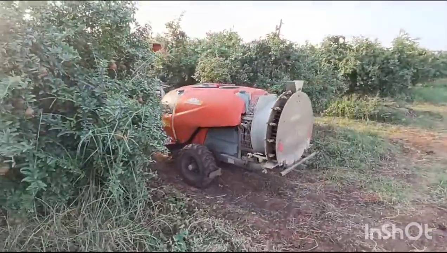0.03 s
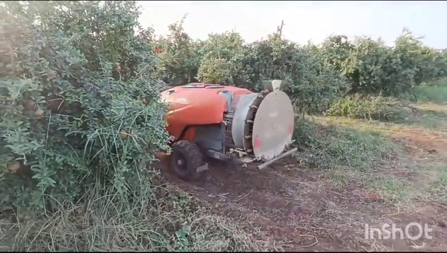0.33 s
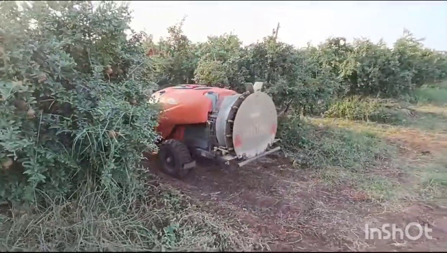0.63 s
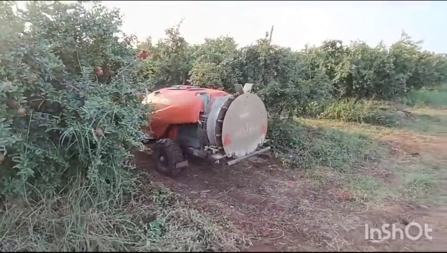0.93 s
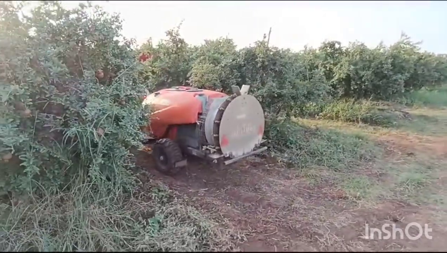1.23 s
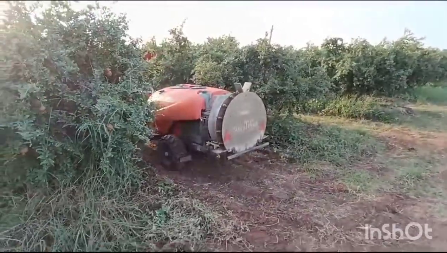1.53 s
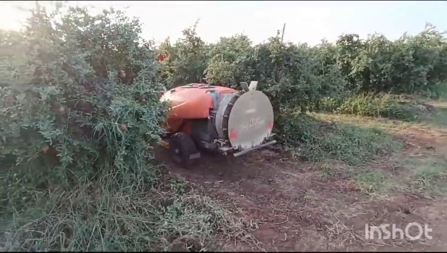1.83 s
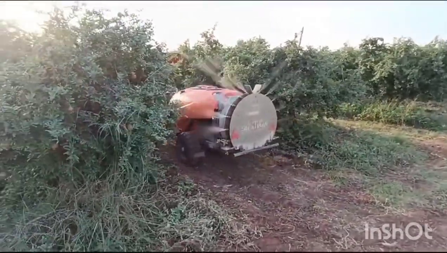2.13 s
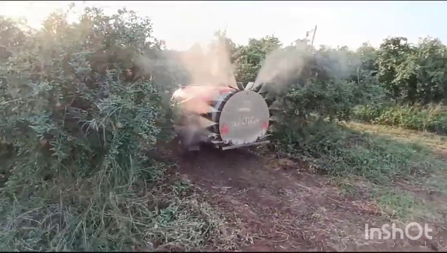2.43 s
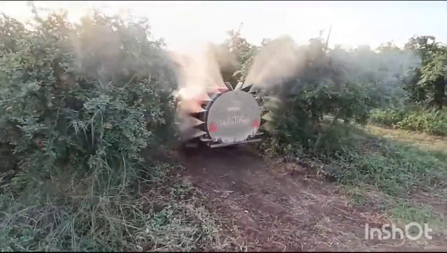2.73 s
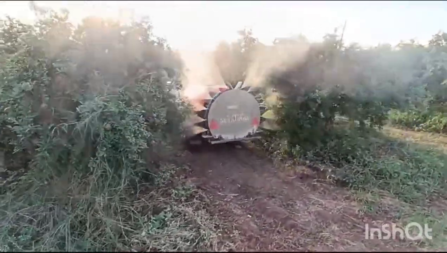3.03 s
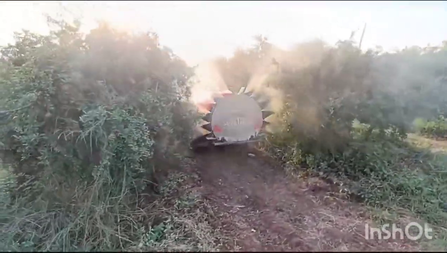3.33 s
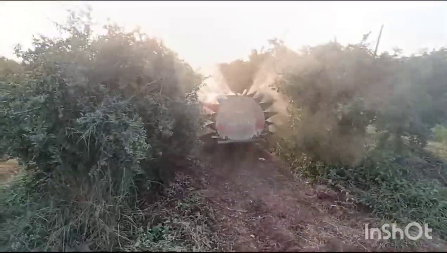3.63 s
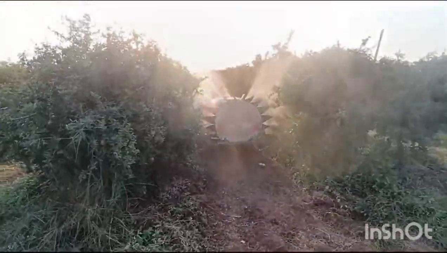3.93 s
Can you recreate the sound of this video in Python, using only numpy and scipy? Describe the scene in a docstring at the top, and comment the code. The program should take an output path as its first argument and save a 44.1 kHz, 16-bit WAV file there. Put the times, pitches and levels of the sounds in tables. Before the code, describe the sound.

A sprayer fan builds to a rushing roar among orchard rows. First a diesel tractor chugs at idle in light wind, then the drive clunks in and squeals faintly, and the blower and hissing nozzles take over.

```python
"""Tractor starting an orchard sprayer

A diesel tractor idles between orchard rows, each firing puffing the exhaust and jolting the engine.
The drive of its air-blast sprayer engages with a clunk, drags the engine down and chirps on each firing
while it slips. The fan winds up to a roar and the nozzles hiss as liquid breaks into mist.
Close by there is light wind, a twig snap, a few dry ticks and a short swish."""
import sys
import numpy as np
from scipy import signal
from scipy.fft import rfft, irfft
from scipy.io import wavfile
from scipy.ndimage import uniform_filter1d, map_coordinates

SR = 44100
rng = np.random.default_rng(int(sys.argv[2]) if len(sys.argv) > 2 else 0)


def digitize_waveform(pressure):
    """Quantize a signal to 16-bit integers and store it at the path in sys.argv[1].

    Rows of a 2-D input are taken as channels; values are limited to [-1, 1].
    """
    field = np.atleast_2d(pressure).T
    bounded = np.clip(field, -1, 1)
    quanta = np.round(bounded * 32767).astype(np.int16)
    wavfile.write(sys.argv[1], SR, quanta)


N = 176400
T = np.arange(N) / SR

# how often the engine fires (t/s, f/Hz)
FIRING_RATE = [(0, 38.6), (.75, 38.2), (1.28, 38.6), (1.37, 37.8), (1.5, 35.0), (1.64, 33.8), (2.2, 33.8),
               (2.5, 34.9), (2.9, 36.0), (3.25, 35.7), (3.65, 35.2), (4, 35.5)]
# exhaust tones: running free, under load, and with the fan up to speed (firing rate multiple, level/dB)
FREE_NOTE = [(1, -0.5), (2, -11.5), (3, -15.5), (4, 2), (5, -3.5), (6, -14.5), (7, -23), (8, -7),
             (9, -14.5), (10, -19.5), (11, -17), (12, -19.5), (13, -20.5), (14, -33)]
LOAD_NOTE = [(1, -11), (2, 2), (3, 1.5), (4, 2), (5, -5), (6, -21), (7, -11.5), (8, -21.5), (9, -13.5),
             (10, -7), (11, -19), (12, -15), (13, -12), (14, -6)]
DRONE_NOTE = [(1, -38.5), (2, -34.5), (4, -26)]
# engine clatter; a spectrum says how strong a noise is from low to high (f/Hz, level/dB)
CLATTER_SPECTRUM = [(25, -26), (60, 1), (170, 2.5), (300, -3.5), (480, -0.5), (720, -13), (880, -10),
                    (1100, -19.5), (1400, -12), (1700, -21.5), (2100, -17.5), (3300, -21), (4300, -22.5),
                    (6400, -29.5), (8200, -32.5), (11000, -37.5), (15500, -49)]
# ringing tones of the engine block; t60 is the time to fade by 60 dB (f/Hz, level/dB, t60/s)
BLOCK_RINGS = [(900, 2.5, 0.044), (1392, -1.5, 0.11), (2030, -1, 0.056), (2416, -6, 0.056),
               (2770, -4, 0.083), (3410, -13, 0.044), (3860, -2.5, .04), (4260, -4, .05), (6420, -11, .04)]
# light wind (f/Hz, level/dB)
BREEZE_SPECTRUM = [(15, -7), (35, -10), (70, -3.5), (120, -7), (300, -3), (1000, -67)]
# a twig snap and small dry ticks (t/s, level/dB, t60/s)
SNAP = (.0838, -20.5, 0.045)
TICKS = [(.209, -35.5, .03), (.231, -49, .04), (1.705, -38, .025)]
# the snap, the ticks, swishing stalks and a faint rustle (f/Hz, level/dB)
SNAP_SPECTRUM = [(300, -14), (900, -14), (1300, -7.5), (1700, 4), (2200, -15), (4200, -12.5), (6000, -26),
                 (8200, -26), (15500, -35)]
TICK_SPECTRUM = [(1500, -16), (5000, 3), (8000, -3), (11000, -4), (15500, -9)]
SWISH_SPECTRUM = [(800, -25), (2000, -1), (3100, 2), (5000, -2), (8000, -14), (11000, -23), (15500, -35)]
RUSTLE_SPECTRUM = [(2000, -8), (5000, -2), (10000, -9), (13000, -4), (15500, 2)]
# thin squeaks (t/s, f/Hz, level/dB)
SQUEAKS = [(.398, 7450, -42), (1.487, 7550, -47), (1.516, 7000, -43.5)]
# steel parts meeting as the drive engages (t/s, level/dB)
CLUNK_HITS = [(1.426, -1), (1.433, -8.5), (1.444, -2.5)]
# their ringing tones (f/Hz, level/dB, t60/s)
CLUNK_RINGS = [(346, -0.5, 0.15), (761, -10, 0.23), (1037, -1, 0.19), (1124, -4, .12), (2050, -12, 0.23),
               (2430, -24, 0.35), (2820, -9, 0.38), (3270, -4, 0.15), (3636, -4, 0.15), (3710, -20, 0.2),
               (5000, -6, 0.081), (5740, -13.5, 0.29)]
# the crash of the first hit (f/Hz, level/dB)
CRASH_SPECTRUM = [(150, -6), (350, 4.5), (1100, -0.5), (1600, -10.5), (3400, -8.5), (5500, -15),
                  (8300, -20.5), (12000, -29), (15500, -40)]
# loudness of the slipping drive (t/s, level/dB)
SLIP_LEVEL = [(0, -100), (1.46, -62), (1.59, -39.5), (1.78, -40), (1.95, -37), (2.25, -46), (2.6, -53),
              (4, -91)]
# the tones it squeals on (f/Hz, width/Hz, level/dB)
SLIP_TONES = [(2130, 56.3, -2.5), (2440, 50, -1.5), (4370, 150, 0), (7100, 200, -15)]
# loudness of the fan's three noises (t/s, rumble level/dB, rush level/dB, high air level/dB)
FAN_LEVELS = [(0, -83, -80, -80), (1.4, -62, -70, -63), (1.7, -42, -41, -47.5), (1.85, -41, -31.5, -44.5),
              (1.97, -27, -25.5, -35), (2.2, -33, -23, -30.5), (2.4, -21.5, -20.5, -31),
              (2.58, -23, -21, -31.5), (2.9, -22, -21, -31), (3.2, -24, -22, -31.5),
              (3.55, -21, -23.5, -35), (3.75, -23.5, -22, -34.5), (4, -20.5, -22.5, -34)]
# the same three noises from low to high (f/Hz, level/dB)
RUMBLE_SPECTRUM = [(20, -39), (45, -18), (100, -17.5), (125, -7), (150, 2), (178, -5), (212, -14.5),
                   (300, -20), (600, -44)]
RUSH_SPECTRUM = [(100, -23), (200, -5), (270, -4), (320, -7), (400, -1), (460, 4), (520, 0.5), (620, -6.5),
                 (740, -6.5), (900, -5.5), (1040, -10.5), (1200, -8.5), (1500, -18.5), (2500, -36),
                 (6000, -56.5)]
AIR_SPECTRUM = [(600, -12.5), (1400, -2.5), (2300, -1), (3300, 0), (4500, -5), (7000, -15), (15500, -28)]
# pitch of the rushing air as the fan winds up (t/s, pitch ratio)
RUSH_PITCH = [(1.5, .85), (2.1, .9), (2.55, 0.95), (2.9, 1.002), (3.5, 1.03), (4, 1.027)]
# loudness of the nozzles (t/s, level/dB)
SPRAY_LEVEL = [(0, -95), (1.85, -85), (1.96, -62), (2.12, -44), (2.3, -33.5), (2.6, -32.5), (3.2, -34),
               (3.7, -35), (4, -37)]
# their hiss (f/Hz, level/dB)
SPRAY_SPECTRUM = [(1500, -21), (4000, -3.5), (6300, 1), (8200, 0), (11000, -1.5), (13000, 0.5),
                  (15500, -7.5)]
# how unlike a noise is at the two microphones (f/Hz, share from 0 to 1)
STEREO_SPREAD = [(60, .06), (250, 0), (500, 0.1), (900, 0.34), (1400, 0.65), (2200, 0.77), (4000, 0.86),
                 (7000, 0.98)]
# how far the left microphone leads the right (f/Hz, phase/rad)
MIC_LEAD = [(550, 0), (860, 0.19), (1600, 1.5), (2000, 0.75)]
# tone colour of the microphones (f/Hz, left level/dB, right level/dB)
MIC_COLOUR = [(1000, 0.5, 0.5), (1430, -1, 2), (1800, 1.5, 0), (2540, 1, 1), (4100, -4.5, 3.5),
              (5740, -10.5, 3), (6460, -11, 6), (7210, -1, -0.5), (8040, 8, -16), (8920, 3, -10.5),
              (11000, -2.5, -5), (11800, -4.5, -5.5), (12800, -8, -3.5), (14500, -13, 5.5), (15700, -37, 4)]


def amp(db):
    """Turn decibels into a factor to multiply by."""
    return 10 ** (np.asarray(db) / 20)


def unit(x):
    """Scale a signal to an average strength (rms) of 1."""
    return x / np.sqrt(np.mean(x ** 2))


def curve(rows, column=1):
    """Join a table's points with straight lines in time."""
    rows = np.array(rows)
    return np.interp(T, rows[:, 0], rows[:, column])


def ramp(start_s, length_s):
    """Rise from 0 to 1 and stay there."""
    return np.clip((T - start_s) / length_s, 0, 1)


def swell(middle_s, width_s):
    """Rise and fall in a bell shape."""
    return np.exp(-.5 * ((T - middle_s) / width_s) ** 2)


def burst(start_s, db, t60, attack_s=0.00037):
    """Rise quickly, then die away."""
    age = np.maximum(T - start_s - attack_s, 0)
    return amp(db) * ramp(start_s, attack_s) * np.exp(-np.log(1000) * age / t60)


def wander(rate_hz):
    """A smooth random wobble, about 1 in size."""
    hold = int(SR / rate_hz)
    steps = np.repeat(rng.standard_normal(N // hold + 1), hold)
    return unit(uniform_filter1d(uniform_filter1d(steps, hold), hold)[:N])


def colour(x, rows, column=1):
    """Filter a sound so that its lows and highs follow a table."""
    rows, size = np.array(rows), 2 * N
    hz = np.maximum(np.arange(N + 1) * SR / size, 1)
    gain = amp(np.interp(np.log(hz), np.log(rows[:, 0]), rows[:, column]))
    cepstrum = irfft(np.log(gain))
    cepstrum[1:N] *= 2  # folded so the filter rings only after a sound, never before
    cepstrum[N + 1:] = 0
    return irfft(rfft(x, size) * np.exp(rfft(cepstrum)))[..., :N]


def noise(spectrum):
    """Stereo noise with a given spectrum, alike on both sides in the bass."""
    mid, side = rfft(rng.standard_normal((2, N)))
    hz = np.arange(len(mid)) * SR / N
    angle = np.pi / 4 * np.interp(hz, *np.array(STEREO_SPREAD).T)
    pair = mid * np.cos(angle) + np.array([[1], [-1]]) * side * np.sin(angle)
    return unit(colour(irfft(pair, N), spectrum))


def bend_pitch(pair, ratios):
    """Play a noise slower or faster to move its pitch."""
    place = np.cumsum(curve(ratios))
    return np.array([map_coordinates(x, [place], order=3, mode="mirror") for x in pair])


def pipe(cycles, note, spread):
    """Tones at multiples of the firing rate; the pipe delays the higher ones more."""
    return unit(sum(amp(db + .12 * k * wander(34.4)) * np.cos(2 * np.pi * (k * cycles - spread * k ** 2))
                    for k, db in note))


def exhaust(cycles, free_db=-25.5, load_db=-27.5, recede_db=-10.5):
    """Slightly uneven puffs make a note that changes under load, then recedes and leaves a drone."""
    cycles = cycles + .003 * wander(40)
    late = cycles - 0.306  # the note lags under load
    load = ramp(1.41, 0.19)
    away = ramp(2.6, 1)  # the tractor turns into the row
    free = amp(free_db) * np.sqrt(1 - load) * pipe(cycles, FREE_NOTE, spread=0.0283)
    loaded = amp(load_db + recede_db * away) * np.sqrt(load) * pipe(late, LOAD_NOTE, spread=0.0213)
    drone = sum(amp(db) * np.cos(2 * np.pi * k * late) for k, db in DRONE_NOTE)
    return free - loaded - drone * away


def clatter(cycles, db=-34.5, steady=3.7, decay_cycles=0.69):
    """Moving engine parts make a noise that flares with each firing."""
    flare = unit(steady + np.exp(-(cycles % 1) / decay_cycles))
    return amp(db + 0.71 * wander(30.1)) * flare * noise(CLATTER_SPECTRUM)


def knock(cycles, level_db=-46.5, scatter_db=4, stray_s=.003):
    """Each firing jolts the engine block; its tones ring briefly, each a little late or early."""
    count, out = int(cycles[-1]), 0
    firing_times = np.interp(np.arange(count) + 1, cycles, T)
    for hz, db, t60 in BLOCK_RINGS:
        timing, strength, phase = rng.standard_normal((count, 3)).T
        at = (np.clip(firing_times + stray_s * timing, 0, T[-1]) * SR).astype(int)
        jolts = np.zeros((2, N), complex)
        jolts[:, at] = amp(db + scatter_db * strength) * np.exp(1j * np.array([phase, -phase]))
        pole = np.exp((2j * np.pi * hz - np.log(1000) / t60) / SR)  # turns a jolt into a fading tone
        out = out + signal.lfilter([1], [1, -pole], jolts).imag
    return amp(level_db) * unit(out)


def hum(hz=396.8, db=-39):
    """A thin tone beside the engine that keeps its pitch."""
    return amp(db + 1.4 * wander(9.96)) * np.sin(2 * np.pi * hz * T + 0.39 * wander(8))


def breeze(db=-40.5):
    """Light wind rumbles on each microphone separately."""
    return amp(db + 1.9 * wander(4.27)) * unit(colour(rng.standard_normal((2, N)), BREEZE_SPECTRUM))


def undergrowth():
    """Twigs and stalks close by snap, tick, swish and rustle in short bursts of noise."""
    snap = burst(*SNAP) * noise(SNAP_SPECTRUM)
    ticks = sum(burst(*tick) for tick in TICKS) * noise(TICK_SPECTRUM)
    swish = burst(.737, db=-30, t60=0.1, attack_s=0.0051) * noise(SWISH_SPECTRUM)
    rustle = amp(-58) * swell(1.03, width_s=.025) * noise(RUSTLE_SPECTRUM)
    return snap + ticks + swish + rustle


def squeaks(fall_hz_per_s=15000, wobble_hz=150):
    """Short, thin squeaks that fall in pitch."""
    out = 0
    for at, hz, db in SQUEAKS:
        pitch = hz - fall_hz_per_s * np.clip(T - at, -.03, .03) + wobble_hz * wander(700)
        out = out + amp(db) * swell(at, width_s=0.0068) * np.sin(2 * np.pi * np.cumsum(pitch) / SR)
    return out


def clunk(db=-26, rattle_rad=.9, apart_hz=3200):
    """Loose steel parts of the drive meet in a few quick hits, then ring and rattle."""
    rings = 0
    for start, hit_db in CLUNK_HITS:
        for hz, ring_db, t60 in CLUNK_RINGS:
            # higher tones reach the two microphones more out of step
            phase = rng.uniform(0, 2 * np.pi) + rng.standard_normal((2, 1)) * min(hz / apart_hz, 1)
            tone = np.sin(2 * np.pi * hz * T + phase + rattle_rad * wander(250))
            rings = rings + burst(start, db + hit_db + ring_db, t60) * tone
    crash = burst(CLUNK_HITS[0][0], db=-20.5, t60=0.14, attack_s=0.0022) * noise(CRASH_SPECTRUM)
    return rings + crash


def slipping_drive(cycles, lag_cycles=0.65, width_cycles=.15, scatter_db=3.5):
    """The drive slips on each firing and squeals on a few wavering pitches, never twice alike."""
    out = 0
    for hz, width_hz, db in SLIP_TONES:
        from_peak = (cycles - lag_cycles + .04 * wander(29.74) + .5) % 1 - .5
        pulse = np.exp(-.5 * (from_peak / width_cycles) ** 2)
        rasp = 1.1 * np.array([wander(900), wander(900)])
        pitch = hz + width_hz * (rasp + 0.78 * wander(60))
        squeal = np.sin(2 * np.pi * np.cumsum(pitch, axis=1) / SR)
        out = out + amp(db) * unit(pulse * amp(scatter_db * wander(34)) * squeal)
    return unit(out) * amp(curve(SLIP_LEVEL))


def fan(cycles, blades_per_firing=6.42, blade_db=-28.5):
    """Air buffets the housing and rushes out; the blades add a tone geared to the engine."""
    depth = 0.18 * (1 - ramp(1.17, 0.93))  # firings shake the air flow while the drive slips
    throb = 1 + depth * np.cos(2 * np.pi * (cycles - .55))
    rumble = amp(curve(FAN_LEVELS, 1) + 0.98 * wander(12)) * noise(RUMBLE_SPECTRUM)
    rush = amp(curve(FAN_LEVELS, 2) + 0.78 * wander(35.05)) * bend_pitch(noise(RUSH_SPECTRUM), RUSH_PITCH)
    air = amp(curve(FAN_LEVELS, 3) + 0.72 * wander(29.7)) * noise(AIR_SPECTRUM)
    blade_gain = amp(blade_db + 1.5 * wander(7)) * ramp(2.29, 0.3)
    blade_tone = np.sin(2 * np.pi * blades_per_firing * cycles + 0.2 * wander(12))
    return throb * (rumble + rush) + air + blade_gain * blade_tone


def nozzles():
    """Liquid under pressure hisses as it breaks into mist."""
    return amp(curve(SPRAY_LEVEL) + 0.24 * wander(16)) * noise(SPRAY_SPECTRUM)


def scene():
    """Add up all the sounds; the firings set the beat for the engine, the drive and the fan."""
    cycles = np.cumsum(curve(FIRING_RATE)) / SR + .35  # goes up by 1 with each firing
    tractor = exhaust(cycles) + clatter(cycles) + knock(cycles) + hum()
    small_sounds = breeze() + undergrowth() + squeaks()
    sprayer = clunk() + slipping_drive(cycles) + fan(cycles) + nozzles()
    return tractor + small_sounds + sprayer


def record(dry, top_hz=15750):
    """Two microphones hear the scene slightly out of step, each with its own colour; the top is cut."""
    hz = np.arange(N + 1) * SR / (2 * N)
    lead = np.interp(hz, *np.array(MIC_LEAD).T)
    left, right = irfft(rfft(dry, 2 * N) * np.exp(.5j * np.array([lead, -lead])))[:, :N]
    pair = np.array([colour(left, MIC_COLOUR, column=1), colour(right, MIC_COLOUR, column=2)])
    return signal.sosfilt(signal.ellip(12, .2, 80, top_hz, fs=SR, output="sos"), pair)


dry = scene()
out = record(dry)
digitize_waveform(out)
```